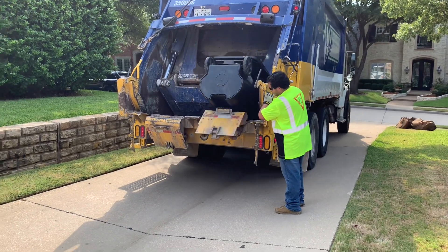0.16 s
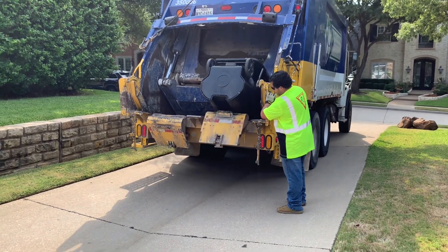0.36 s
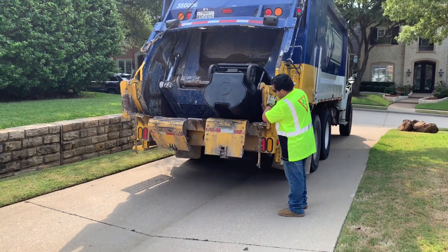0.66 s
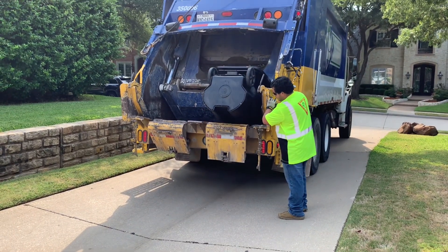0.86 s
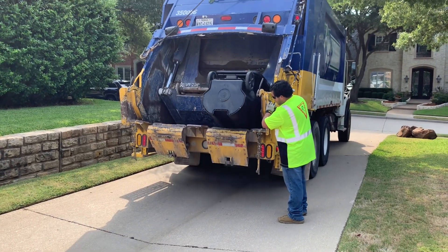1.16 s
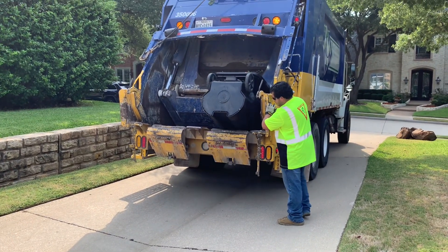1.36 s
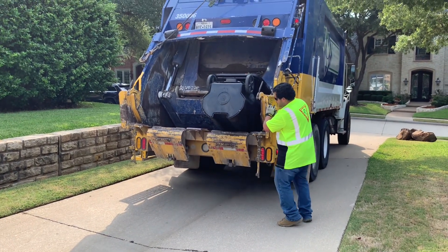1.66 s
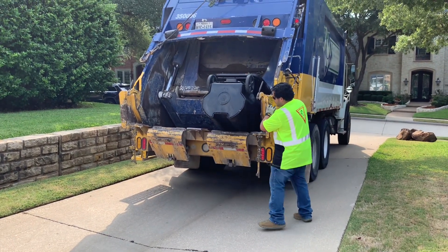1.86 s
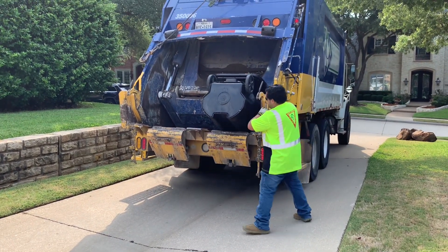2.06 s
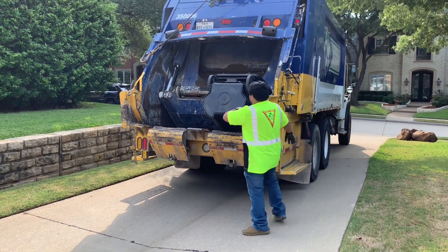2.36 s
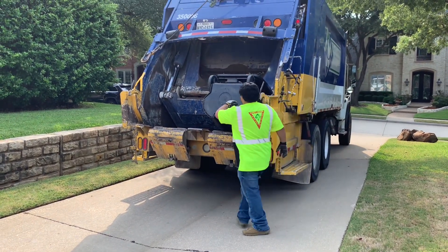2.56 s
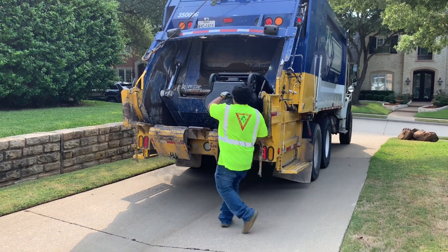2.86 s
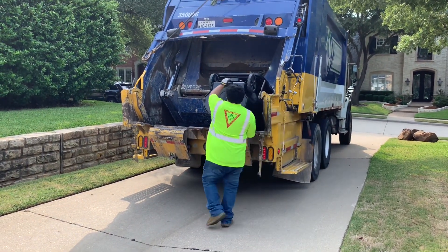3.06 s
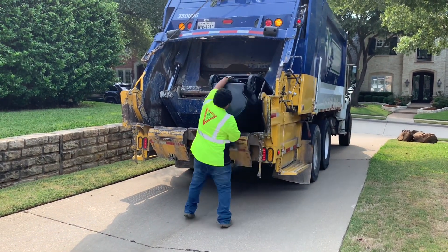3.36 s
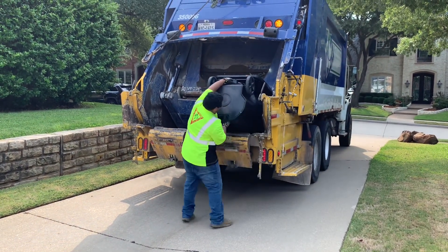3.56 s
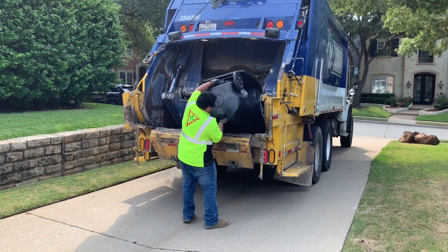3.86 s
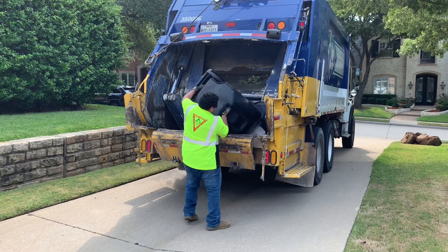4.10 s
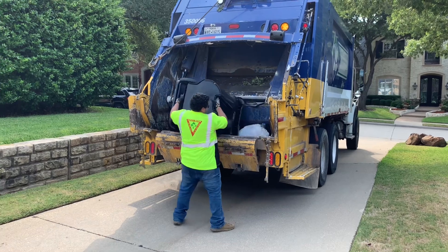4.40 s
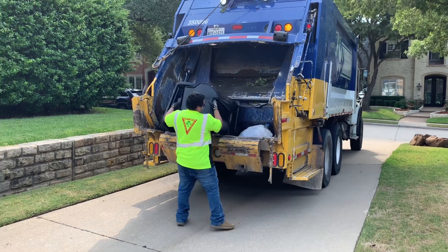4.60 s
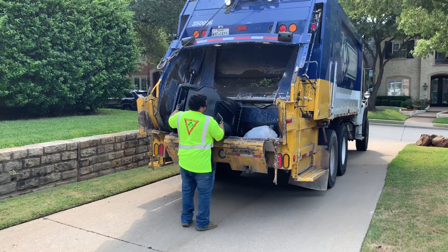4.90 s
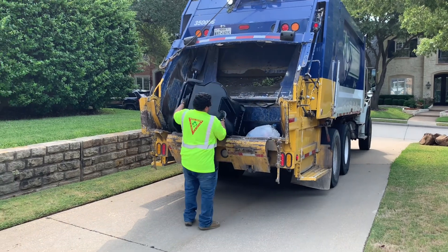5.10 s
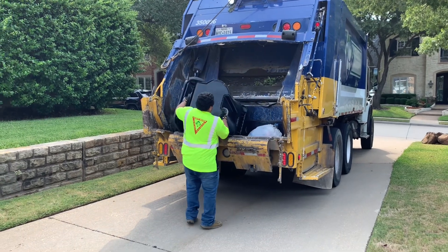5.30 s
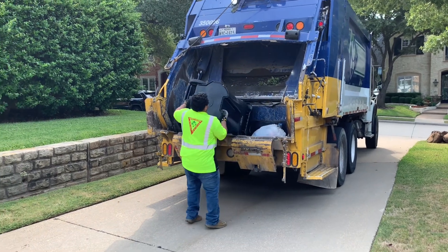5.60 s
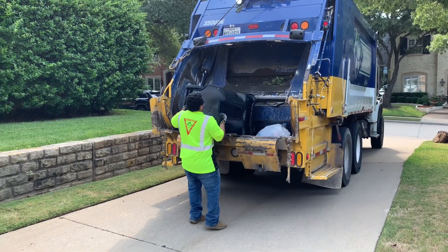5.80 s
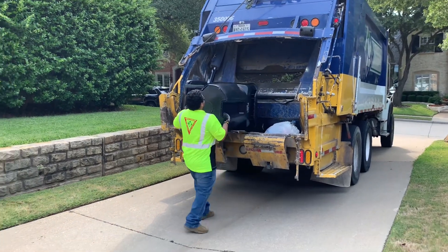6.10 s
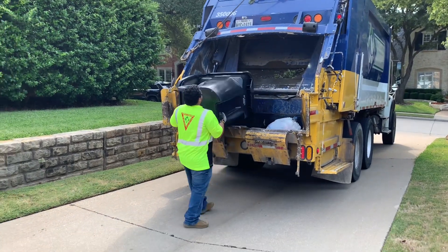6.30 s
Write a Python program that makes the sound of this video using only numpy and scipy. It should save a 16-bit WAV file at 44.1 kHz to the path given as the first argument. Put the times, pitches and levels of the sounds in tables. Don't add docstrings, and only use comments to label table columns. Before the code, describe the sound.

Outdoors on a driveway, a garbage truck idles with a lumpy diesel clatter while hydraulic oil hisses and sings. Steel knocks come first, then a violent slam stops the hiss. The engine briefly revs up, its whine rising and settling, while a thin turbo whistle slides down. Later a plastic bin thumps hollowly in the hopper. A handheld phone a few metres away catches buffeting wind.

```python
import sys
import numpy as np
from scipy import signal
from scipy.fft import rfft, irfft, next_fast_len
from scipy.io import wavfile
from scipy.ndimage import map_coordinates

SR = 44100
rng = np.random.default_rng(int(sys.argv[2]) if len(sys.argv) > 2 else 0)


def wav_out(sig):
    wavfile.write(sys.argv[1], SR, np.round(np.clip(np.atleast_2d(sig).T, -1, 1) * 32767).astype(np.int16))


def decibels_to_gain(level_db):
    exponent = np.asarray(level_db, float) / 20
    return 10 ** exponent


N = 284445


def unit(x):
    return x / np.sqrt(np.mean(x ** 2) + 1e-20)


def along(points, hz):
    f, v = np.transpose(points)
    return np.interp(np.log(hz + 1), np.log(f + 1), v)


def curves(rows):
    s, *cols = np.transpose(rows)
    return [np.interp(np.arange(N) / SR, s, c) for c in cols]


def wobble(rate):
    return map_coordinates(rng.standard_normal(size=400), [np.arange(N) * rate / SR])


def filtered(x, response):
    m = next_fast_len(x.shape[-1] + SR // 5)
    return irfft(rfft(x, m) * response(np.fft.rfftfreq(m, 1 / SR)), m)[..., :x.shape[-1]]


def body(modes):
    def response(f):
        total = 0
        for k, (c, w, db) in enumerate(modes):
            total = total + (-1) ** k * decibels_to_gain(db) * 1j * f * w / (c * c - f * f + 1j * f * w)
        return total
    return response


def colour(points):
    return lambda f: decibels_to_gain(along(points, f))


def noise():
    return rng.standard_normal((2, N))


def whistle(hz, db, rough, waver_db=0.0, waver_rate=16):
    turn = 2 * np.pi * np.cumsum(hz) / SR + rough * wobble(25)
    scattered_turn = turn + np.pi / 2 + 0.91 * wobble(7.2)
    return np.sqrt(2) * decibels_to_gain(db + waver_db * wobble(waver_rate)) * np.sin([turn, scattered_turn])


# (time [s], level over idle [dB])
SWELL = [(0, 1), (.39, 6), (.72, 1.5), (1.2, 2.5), (2.2, 0), (2.6, -0.5), (3.9, 0), (4.4, 1), (4.8, 0),
         (5.3, 1.5), (5.8, -.5), (6.45, 0)]
BLOCK_DB, PIPE_DB, PIPE_GROWS = -36, -31.5, 0.87


def engine():
    gear_hz, gear_db = engine_speed()
    swell_db, = curves(SWELL)
    block_db = BLOCK_DB + swell_db
    pipe_db = PIPE_DB + PIPE_GROWS * swell_db
    fired, blow = firings(gear_hz)
    sound = decibels_to_gain(pipe_db + 3.0) * exhaust(blow) + decibels_to_gain(block_db) * clatter(blow)
    sound = sound + drone(gear_hz) + loose_cover(fired, blow, block_db) + fan_rush(blow)
    return sound + whistle(gear_hz, gear_db, rough=0.5) + turbo()


# (time [s], whine [Hz], level [dB])
GEAR = [(0, 1698, -58), (1.24, 1705, -72), (1.4, 1743, -64), (1.68, 1873, -46.5), (1.95, 1812, -40),
        (2.2, 1725, -50.5), (2.45, 1691, -55), (2.7, 1683, -48), (3.2, 1705, -47.5), (4, 1699, -42.5),
        (6.45, 1691, -49.5)]
TEETH = 45.25


def engine_speed():
    return curves(GEAR)


CYLINDERS = [-1.5, -7, -5, -2.5, 0.5, -23]


def firings(gear_hz):
    fired = np.cumsum(gear_hz / TEETH) / SR
    firing = fired.astype(int)
    uneven_db = 0.85 * rng.standard_normal(size=400)[firing]
    strength = decibels_to_gain(np.array(CYLINDERS)[firing % len(CYLINDERS)] + uneven_db)
    return fired, strength * np.exp(-(fired % 1) / 0.041)


def onsets(blow):
    return unit(np.diff(blow, prepend=0).clip(0))


# (frequency [Hz], width [Hz], level [dB])
PIPE = [(73.7, 44, -7.5), (115.4, 37, 0), (155.2, 36.4, 0), (190, 30.7, -3.5), (240.6, 43.6, -5),
        (323.8, 35, -6), (415.5, 61, -9.5)]


def exhaust(blow):
    puffs = onsets(blow) + 2.42 * noise()
    return unit(filtered(puffs, body(PIPE)))


# (frequency [Hz], width [Hz], level [dB])
BLOCK = [(598, 221, -3), (800, 373, -0.5), (1031, 176, 0), (1430, 286, -9), (1748, 168, -3.5),
         (1952, 145, -7), (2445, 530, -13.5), (3490, 1240, -21)]


def clatter(blow):
    uneven = decibels_to_gain(.8 * wobble(7))
    return unit(filtered((1 + 0.54 * blow) * uneven * noise(), body(BLOCK)))


# (frequency [Hz], width [Hz], level [dB])
COVER = [(1025, 55, 1.5), (800, 110, -9)]
COVER_DB, COVER_GROWS_DB_PER_S = -9, .9


def loose_cover(fired, blow, block_db):
    t = np.arange(N) / SR
    cycle = (fired - fired[-1]) / len(CYLINDERS) + .58
    beat = (.5 + .5 * np.cos(2 * np.pi * cycle)) ** 1.6 * (1 + blow) + .22
    play = wobble(11)
    buzz = 0.06 * np.sin(2 * np.pi * COVER[0][0] * t + 2.5 * play)
    taps = beat * decibels_to_gain(.8 * play) * (noise() + buzz + 0.3 * onsets(blow))
    return decibels_to_gain(block_db + COVER_DB + COVER_GROWS_DB_PER_S * t) * unit(filtered(taps, body(COVER)))


# (frequency [Hz], level per Hz [dB])
FAN = [(30, -53), (100, -2), (500, -18.5), (2000, -34), (4000, -32), (5500, -37), (7500, -34.5),
       (10000, -38.5), (16000, -37)]


def fan_rush(blow):
    return decibels_to_gain(-36) * unit(filtered((1 + 0.28 * blow) * noise(), colour(FAN)))


# (multiple of the firing rate, level [dB])
ORDERS_OF_FIRING = [(2, -44), (3, -37), (4, -39), (5, -44), (41 / 6, -45)]


def drone(gear_hz):
    return sum(whistle(k * gear_hz / TEETH, db, rough=0.21) for k, db in ORDERS_OF_FIRING)


# (time [s], whistle [Hz])
TURBO = [(0, 6250), (.5, 6330), (1.7, 6590), (2.2, 6100), (2.45, 5950), (2.65, 5880), (3.1, 5610),
         (3.7, 5400), (4.7, 5190), (6.45, 5025)]
# (frequency [Hz], level [dB])
HOUSING = [(5030, -60), (5120, -57), (5260, -65), (5370, -60), (5600, -68), (5880, -61), (6050, -64),
           (6600, -60)]
LOADED_DB = -6


def turbo():
    hz, = curves(TURBO)
    loaded = np.arange(N) / SR < SHUT_S
    return whistle(hz, along(HOUSING, hz) + LOADED_DB * loaded, rough=0.3, waver_db=5, waver_rate=14)


# (frequency [Hz], level per Hz [dB])
JET = [(300, -42), (900, 18), (2500, -0.5), (6000, 2.5), (8500, 6), (13500, -4), (16000, -13)]
# (frequency [Hz], width [Hz], level [dB])
VALVE = [(1430, 55, 22.5), (1558, 25, 24.5), (1586, 34, 27.5), (4370, 38, 14), (5540, 33, 11),
         (6015, 37, 15), (10500, 200, 9.5), (10900, 550, 9), (14800, 1200, 6)]


def hydraulics():
    flow_db = flow()
    jet = filtered(noise(), lambda f: np.hypot(decibels_to_gain(along(JET, f)), abs(body(VALVE)(f))))
    hum = whistle(1608 + 6 * wobble(5.04), flow_db - 0.5, rough=0.85)
    return decibels_to_gain(flow_db + 9.5 + 0.29 * wobble(13)) * unit(jet) + hum


# (time [s], level [dB])
SURGES = [
    (.226, -45),
    (1.272, -38),
    (1.438, -46.5),
    (1.83, -55),
]
SURGE_DB_PER_S = -750
FLOW_DB, SAG_DB_PER_S, SHUT_S = -39.5, -0.8, 1.275
LEAK_DB, LEAK_ENDS_S, DRAIN_DB_PER_S, TRICKLE_DB = -47.5, 1.53, -99, -58


def flow():
    t = np.arange(N) / SR
    draining_db = LEAK_DB + DRAIN_DB_PER_S * (t - LEAK_ENDS_S).clip(0)
    trickle_db = TRICKLE_DB - 60 * (t - 1.9).clip(0)
    leak_db = np.maximum(draining_db, trickle_db)
    steady = decibels_to_gain(np.where(t < SHUT_S, FLOW_DB + SAG_DB_PER_S * t, leak_db))
    surges = sum(decibels_to_gain(db + SURGE_DB_PER_S * abs(t - s)) for s, db in SURGES)
    return 20 * np.log10(steady + surges)


PUMP_DB, PUMP_IDLE_DB, PUMP_DB_PER_HZ = -32, -48, .07


def pump():
    gear_hz, _ = engine_speed()
    pressure = np.interp(np.arange(N) / SR, [.15, .35, 1.1, 1.2], [.3, 1, 1, 0])
    db = PUMP_IDLE_DB + (PUMP_DB - PUMP_IDLE_DB) * pressure + PUMP_DB_PER_HZ * (gear_hz - gear_hz[-1])
    return whistle(41 / 6 * gear_hz / TEETH, db, rough=.3, waver_db=3 - 2 * pressure, waver_rate=2.5)


# (time [s], peak [dB], boom level [dB], boom pitch [Hz], sizzle level [dB])
SLAMS = [(.212, -13, -22.5, 900, -6), (.279, -19, -21, 315, -8), (.34, -18, -26, 440, 0),
         (.399, -18.5, -23.5, 744, 6), (.465, -37, -22.5, 250, -1), (1.12, -31, -12.5, 169, -9),
         (1.261, -4.5, -17, 754, -8), (1.267, -8.5, -6.5, 190, 6), (1.284, -11, -39, 965, -16),
         (1.292, -11, -35, 1140, -14), (1.309, -18.5, -23.5, 474, -4), (1.362, -22, -29, 640, -2),
         (1.439, -26, -27, 390, 6), (1.495, -22.5, -45, 410, -1), (1.609, -38, -32, 397, -8),
         (2.63, -25, -33, 355, -5)]
# (frequency [Hz], width [Hz], level [dB])
STEEL = [(184, 92, 0.5), (440, 320, -4.5), (754, 164, 0), (856, 155, 0.5), (1130, 366, -4.5),
         (1520, 230, -6), (1845, 210, -7.5), (2224, 260, -12.5), (2910, 340, -10.5), (3160, 1280, -16),
         (5570, 1100, -34)]


def steel_slams():
    return knocks(SLAMS, STEEL, rise=0.00094, t60=0.062, boom_fade=.7, sizzle_hz=3020)


# (time [s], peak [dB], boom level [dB], boom pitch [Hz], sizzle level [dB])
THUMPS = [(3.491, -26, -35.5, 1858, -5), (3.52, -28, -38.5, 2050, 5), (3.55, -27, -37, 1800, -10),
          (3.654, -35, -35, 400.2, 8), (3.988, -20.5, -26.5, 800, -3), (4.0, -24, -20.5, 347, -8),
          (4.181, -14, -33, 190, 12), (4.193, -7.5, -7, 334.3, 3), (4.228, -17.5, -10.5, 326, -5),
          (4.29, -21, -14.5, 54, -11), (4.405, -18.5, -32, 392.4, 9), (4.424, -16, -33, 367.5, 2),
          (4.447, -13.5, -20, 61.86, 7), (4.468, -16.5, -35, 2010, 2), (4.505, -21, -22, 58, 5.5),
          (4.575, -32, -19.5, 52, 10), (5.626, -23, -29, 800, -14)]
# (frequency [Hz], width [Hz], level [dB])
PLASTIC = [(190, 81, 0.5), (334, 84, 5.5), (585, 67, -4), (726, 103, -1.5), (1266, 250, -7.5),
           (1466, 150, -4), (1800, 130, -6), (2260, 190, -11), (3370, 1010, -19.5)]


def bin_thumps():
    return knocks(THUMPS, PLASTIC, rise=0.0043, t60=0.087, boom_fade=0.72, sizzle_hz=5014)


DEEP_HZ = 130


def knocks(events, modes, rise, t60, boom_fade, sizzle_hz):
    def bright(f):
        high = 1j * f / sizzle_hz / (1 + 1j * f / sizzle_hz)
        return high ** 2 / (1 + 1j * f / 9000) ** 2

    out = np.zeros(N + SR)
    t = np.arange(SR // 3) / SR
    fade = decibels_to_gain(-60 * t / max(t60, .01))
    for s, db, boom_db, boom_hz, sizzle_db in events:
        rattle = rng.standard_normal((2, len(t))) * fade * (1 - np.exp(-t / rise))
        swell = 1 - np.exp(-t / 0.0015)
        boom_decay = fade ** (boom_fade * min(boom_hz / DEEP_HZ, 1))
        boom = boom_decay * swell * np.sin(2 * np.pi * boom_hz * t)
        sizzle = decibels_to_gain(sizzle_db - 23.5) * filtered(rattle[1], bright)
        sound = decibels_to_gain(db + 16.5) * (filtered(rattle[0], body(modes)) + sizzle) + decibels_to_gain(boom_db + 5.5) * boom
        out[round(s * SR):][:len(t)] += sound
    return out[:N]


# (frequency [Hz], time to fall 60 dB [s])
YARD = [(200, 0.57), (2000, 0.21), (10000, 0.23)]


def yard(x):
    hz, t, z = signal.stft(rng.standard_normal((2, SR // 2)), SR, nperseg=256)
    decay = decibels_to_gain(-60 * t / along(YARD, hz)[:, None])
    tail = signal.istft(z * decay, SR, nperseg=256)[1]
    return signal.fftconvolve(x[None], tail / np.linalg.norm(tail[0]), axes=1)[:, :N]


# (frequency [Hz], level per Hz [dB])
BUFFET = [(15, -48), (30, -19), (50, -1), (75, 0), (110, -5.5), (200, -27.5), (500, -46), (2000, -100)]
# (frequency [Hz], level per Hz [dB])
FLUTTER = [(40, -43), (90, -6), (130, 3.5), (170, -1.5), (230, -4), (400, -22), (1000, -90)]


def wind():
    buffet_gain, flutter_gain = gusts()
    swing = unit(filtered(decibels_to_gain(3.0 * wobble(14)) * noise(), colour(BUFFET)))
    flutter = unit(filtered(decibels_to_gain(1.8 * wobble(15)) * noise(), colour(FLUTTER)))
    return buffet_gain * swing + flutter_gain * flutter


# (time [s], buffet level [dB], flutter level [dB], rise time of the last 10 dB [s])
GUSTS = [(.3, -20, -37, -0.1), (.39, -13.5, -28, 0.07), (.81, -26, -27, 0.37), (1.131, -19, -17.5, -0.03),
         (1.225, -8.5, -19, 0.04), (1.36, -21, -20, 0.2), (1.53, -10, -17, 0.04), (1.63, -13, -16, 0.0456),
         (1.761, -17, -16.5, 0.09), (1.89, -21.5, -28, 0.1), (2.02, -35, -19, 0.08), (2.19, -33, -36, 0.26),
         (2.32, -45, -23.5, 0.12), (2.95, -26.5, -35.5, 0.48), (3.14, -30, -19.5, 0.09),
         (3.4, -19.5, -24, 0.1), (3.54, -21, -26.5, 0.1), (3.74, -18, -32, -0.06),
         (3.83, -13.5, -43, -0.23), (4.22, -28, -22.5, 0.1), (4.31, -13.5, -21, 0.01),
         (4.47, -15.5, -22, 0.04), (4.61, -18.5, -29, 0.14), (5.03, -26, -29.5, 0.39),
         (5.28, -25, -43, -0.2), (5.46, -23, -26.5, 0.03), (5.68, -23, -24, 0.06),
         (5.86, -29.5, -34.5, 0.24), (6.25, -44, -35, 0.34)]
FALL_OVER_RISE, CALM_BUFFET_DB, CALM_FLUTTER_DB = 0.85, -36.5, -38.5


def gusts():
    s, buffet_db, flutter_db, rise = np.transpose(GUSTS)[..., None]
    late = (np.arange(0, N + 64, 64) / SR - s) / np.maximum(rise, .01)
    power = decibels_to_gain(-10 * np.maximum(-late, late / FALL_OVER_RISE)) ** 2

    def gain(db, calm_db):
        coarse = np.sqrt((decibels_to_gain(db) ** 2 * power).sum(axis=0) + decibels_to_gain(calm_db) ** 2)
        return np.interp(np.arange(N) / 64, np.arange(len(coarse)), coarse)

    return gain(buffet_db, CALM_BUFFET_DB), gain(flutter_db, CALM_FLUTTER_DB)


def scene():
    hits = steel_slams() + bin_thumps()
    hits = hits * decibels_to_gain([[0], [-12]]) + decibels_to_gain([[-8], [-4]]) * yard(hits)
    return engine() + hydraulics() + wind() + pump() + hits


TOP_HZ = 15890


def starved(bands, edge_hz):
    def response(f):
        inside = sum(np.clip(np.minimum(f - lo, hi - f) / edge_hz + .5, 0, 1) for lo, hi in bands)
        return decibels_to_gain(-45 * inside ** 2) * (f < TOP_HZ)
    return response


def top_cut(x):
    return signal.sosfilt(signal.butter(12, 17090, fs=SR, output="sos"), x)


# (frequency [Hz], phase [radians])
LEAD = [(0, 1), (70, 0.43), (430, 6.5), (640, 7), (800, 6.5), (1750, 5.5), (2800, 9), (3600, 10),
        (3900, 7.5), (6300, 8), (8300, 5), (11000, -1.5), (13400, 2), (15600, -1)]
# (frequency [Hz], likeness [0-1])
ALIKE = [(40, 0.4), (130, 0.77), (320, 1), (700, 0.69), (1200, 0.48), (2500, 0.04), (3200, 0.29),
         (5000, 0.67), (6500, 1), (9000, 0.59)]
# (frequency [Hz], level [dB])
TILT = [(60, 0.5), (110, -1.5), (200, -1.0), (380, -1), (700, 0), (1290, 2), (2380, -1), (4400, -2.5),
        (8120, -2), (15000, 2)]
# (from [Hz], to [Hz])
STARVED_MID = [(7700, 8460), (12500, 14500)]
# (from [Hz], to [Hz])
STARVED_SIDE = [(10350, 10500), (15000, 24000)]


def record(dry):
    def shares(f):
        turn = np.arccos(np.clip(along(ALIKE, f), -1, 1)) / 2
        return np.array([np.cos(turn), np.sin(turn)])

    def ports(f):
        half = decibels_to_gain(along(TILT, f) / 2) * np.exp(.5j * np.interp(f, *np.transpose(LEAD)))
        return np.array([half, 1 / half])

    straight, scattered = filtered(dry, shares)
    left, right = filtered(np.array([straight + scattered, straight - scattered]), ports)
    mid = filtered((left + right) / 2, starved(STARVED_MID, edge_hz=1500))
    side = filtered((left - right) / 2, starved(STARVED_SIDE, edge_hz=1400))
    pair = np.array([mid + side, mid - side])
    pair = pair / (1 + np.abs(pair / .97) ** 4) ** (1 / 4)
    return top_cut(pair)


dry = scene()
out = record(dry)
wav_out(out)
```